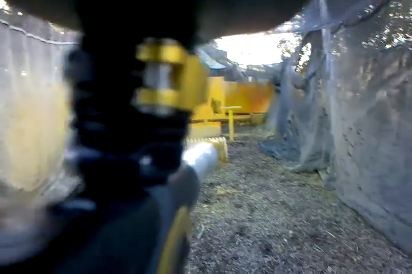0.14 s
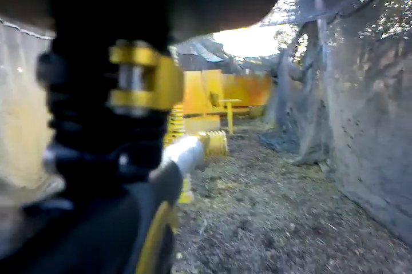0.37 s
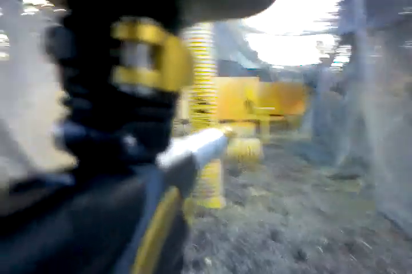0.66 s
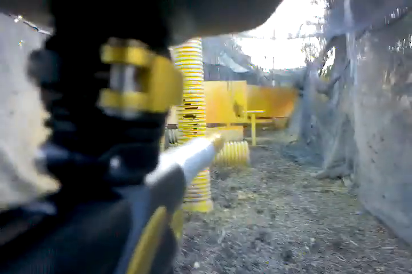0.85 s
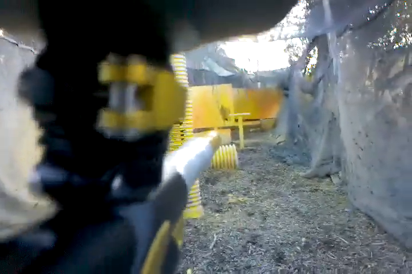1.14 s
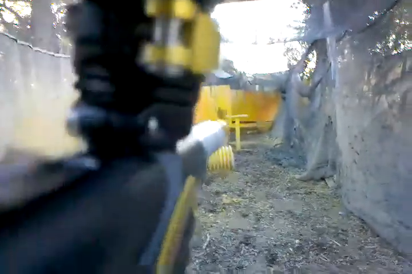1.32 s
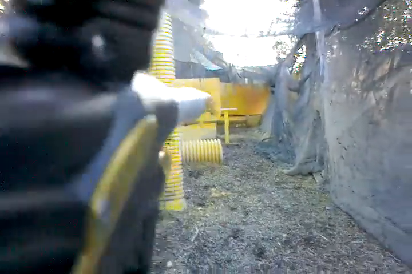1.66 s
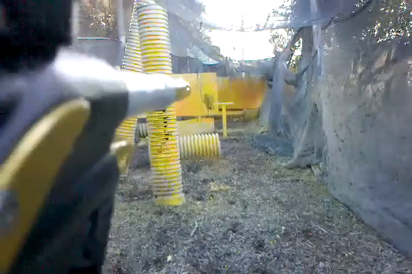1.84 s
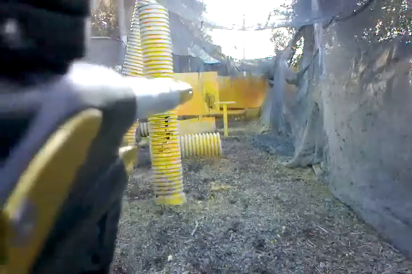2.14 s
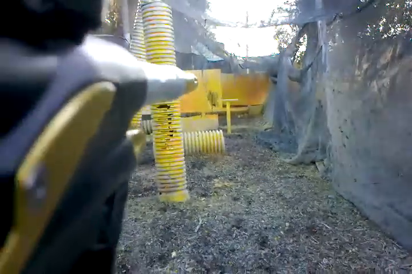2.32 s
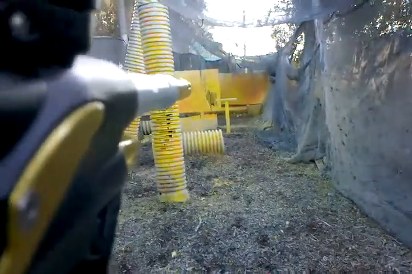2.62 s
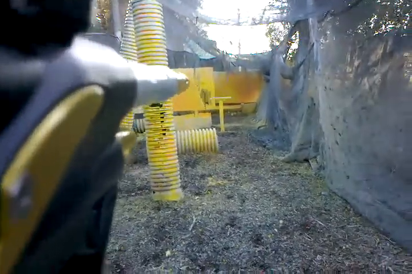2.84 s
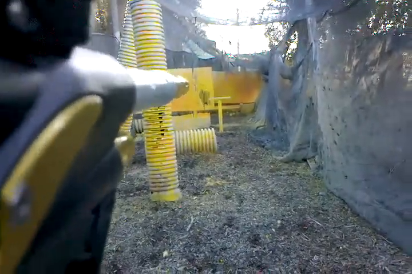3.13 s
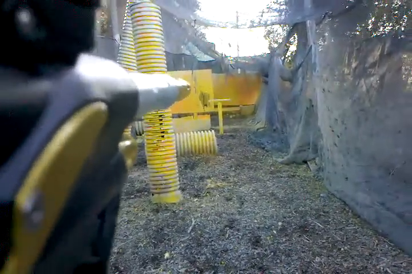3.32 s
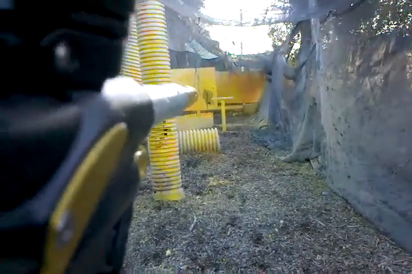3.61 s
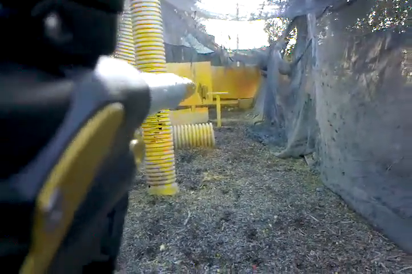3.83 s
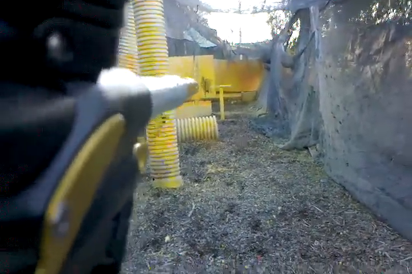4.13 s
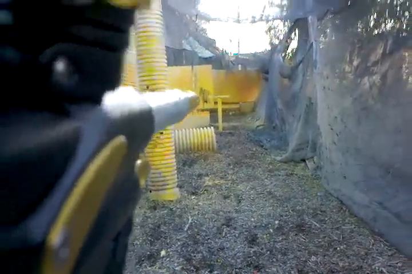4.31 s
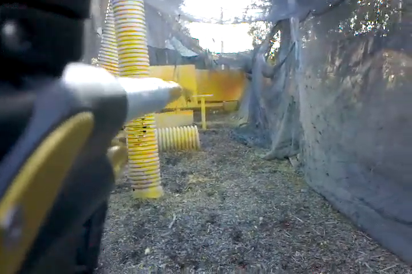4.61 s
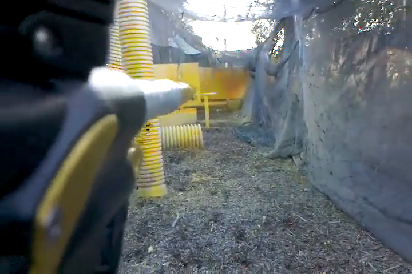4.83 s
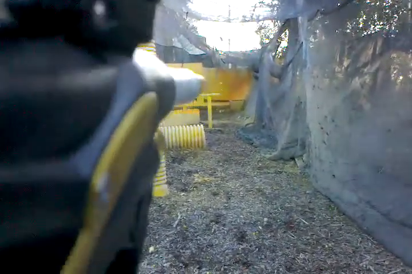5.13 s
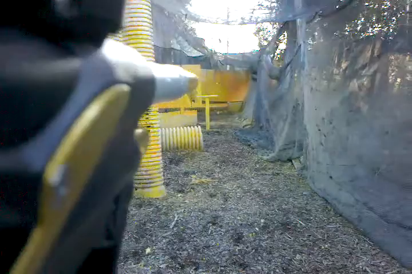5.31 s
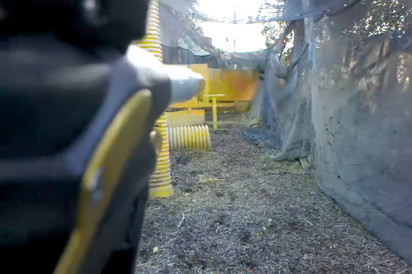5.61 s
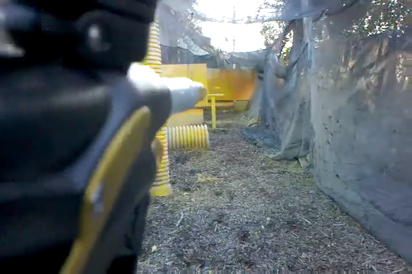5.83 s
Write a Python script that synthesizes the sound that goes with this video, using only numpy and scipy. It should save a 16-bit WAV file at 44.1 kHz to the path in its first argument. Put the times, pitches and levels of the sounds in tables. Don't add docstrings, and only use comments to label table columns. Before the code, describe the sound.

Faint finger clicks, two separate loud paintball marker shots, then a rapid unbroken string of harsh, overloaded shots in a netted outdoor lane.

```python
import sys
import numpy as np
from scipy import signal
from scipy.io import wavfile

SR = 44100
rng = np.random.default_rng(int(sys.argv[2]) if len(sys.argv) > 2 else 0)


def convert_level_to_amplitude(level_db):
    exponent = np.asarray(level_db, float) / 20
    return 10 ** exponent


def unload_audio(sound):
    columns = np.transpose(np.atleast_2d(sound))
    steps = np.round(np.clip(columns, -1, 1) * 32767)
    wavfile.write(sys.argv[1], SR, steps.astype(np.int16))


N = 263026

# (valve opens [s], tightness of the
# ball in the barrel [dB])
SHOTS = [(1.4005, -1.5), (1.6093, -0.5), (1.7351, -1.5), (1.795, -10), (1.838, 1.5), (1.8965, -2),
         (1.9521, -4), (2.0077, -0.5), (2.0661, 2), (2.125, -4), (2.1806, 0), (2.235, -3),
         (2.291, 3), (2.3518, 2.5), (2.407, -2), (2.4641, 1), (2.5227, 1.5), (2.5789, 4),
         (2.6405, -1), (2.701, 0), (2.7593, 3), (2.8143, 3), (2.8747, -0.5), (2.9332, 1),
         (2.987, 1.5), (3.0464, 1), (3.1063, 1), (3.1647, 2), (3.223, -1.5),
         (3.275, 1.5), (3.3307, -4), (3.3839, 0.5), (3.4451, 3), (3.4982, 3), (3.554, 1.5),
                (3.6098, -1.5), (3.6698, -1), (3.7276, -2), (3.7826, -12), (3.8403, -0.5), (3.901, 0),
                (3.957, 2.5), (4.0036, 0), (4.057, 0.5), (4.113, -5), (4.176, -2.5), (4.24, -5),
                (4.2965, 0.5), (4.3504, -2), (4.4098, 0), (4.4675, -0.2), (4.5241, -3.5), (4.5835, -4),
                (4.6328, -1), (4.6881, -1), (4.7484, -4), (4.8035, 2.5), (4.8625, -2), (4.9198, 2),
         (5.0189, 3), (5.0718, -16), (5.128, 2), (5.1859, 2.5), (5.2402, -3), (5.2954, 1.5),
                 (5.343, 2), (5.3935, 3), (5.4481, 1.5), (5.5043, 4), (5.564, 0), (5.618, 4), (5.675, 2),
                 (5.7278, -0.5), (5.821, -5), (5.8761, 0.5), (5.936, 1)]
# (time after the valve opens [ms], level [dB], scatter [ms],
# favoured pitch [Hz], spread [octaves])
BOLT_KNOCKS = [
    (-11, 8, 0.035, 2480, 0.86),
    (-11.5, 7, 0.024, 710, 0.53),
    (-9, 8.5, 0.1, 2080, 0.31),
    (-8, -2, 0.794, 2130, 0.75),
    (-3.5, -2.5, .8, 2430, 0.37),
]
# (time [s], level [dB])
FIRST_KNOCKS = [
    (1.3881, -1),
    (1.3914, 6),
    (1.3977, -1),
]
# (time after the valve opens [ms], level [dB], scatter [ms],
# favoured pitch [Hz], spread [octaves])
VALVE_KNOCKS = [(0.22, 7, 0.015, 1320, 2.33), (1.38, 13.5, 0.017, 1840, 2.1), (2.5, 9, 0.048, 1460, 1.21),
                (5.5, 13, 0.077, 5630, 0.66), (7, 5.5, 0.051, 2500, 1.16), (9.5, 9, 0.05, 5300, 0.52),
                (13, -4, .3, 2400, 0.98), (16.5, 13.5, 0.28, 6500, 0.25), (18.5, 7, .3, 4100, 0.88),
                (20.5, -6, .3, 2100, 1.5), (23, 0, 0.16, 5000, 0.58), (29, -9, 0.04, 1980, 0.28),
                (38, -18, .4, 2250, 0.29)]
# (time after the valve opens [ms], level [dB], scatter [ms],
# favoured pitch [Hz], spread [octaves])
LANE_SLAPS = [
    (49.7, -26, 1.72, 2200, 0.51),
    (71, -18.5, 0.46, 2500, 0.66),
    (100.3, -20, 0.24, 2200, 0.37),
    (140.7, -27, 0.7, 1000, 0.55),
]
# (pitch [Hz], level [dB], time to fade 60 dB [s])
BODY_MODES = [(319.7, -8.5, 0.058), (420.4, -15.5, 0.083), (795, -9, 0.013), (1193, -9, 0.018),
              (1491, -7, 0.021), (1646, -8.5, 0.012), (1975, -12, 0.016), (2400, -8.5, 0.0078),
              (2625, -9, 0.011), (3000, -11.5, 0.012), (3526, -12.5, 0.0091), (3874, -10, 0.0086),
              (4160, -24, 0.012), (5600, -45, 0.0039), (6025, -8.5, 0.0034)]
# (frequency [Hz], level [dB per Hz])
GAS_COLOUR = [(60, -35), (200, 6), (700, 8), (1600, 4), (2600, 14), (3500, -5.5), (4900, 8), (6300, -3.5),
              (10000, -16)]
# (pitch [Hz], width [Hz], level [dB])
PORT_WHISTLES = [(1480, 1700, -8), (2730, 320, -4.5), (6300, 260, -8.5)]
# (pitch [Hz], level [dB], time to fade 60 dB [s], time after the valve opens [ms])
BARREL_AIR = [(167, -13, 0.065, 6.64), (205, -9.5, 0.05, 7.62), (295, -6.5, 0.027, 6.84)]
# (time [s], level [dB], pitch [Hz], time to fade 60 dB [s])
FIRST_THUMP = [
    (1.405, 3, 361, 0.05),
]
# (frequency [Hz], level [dB per Hz])
LANE_COLOUR = [(60, -38), (150, -2), (400, -2.5), (700, -22), (1600, -2), (2400, -15.5), (4300, -22),
               (6500, -21.5), (10000, -16)]
# (frequency [Hz], time to fade 60 dB [s])
LANE_DECAY = [(200, 0.28), (2000, 0.27), (7000, 0.46)]
# (frequency [Hz], level [dB])
SPLAT_COLOUR = [(300, -12.5), (700, -10), (1600, -10.5), (2500, 1), (4000, -11), (6500, -19)]
# (pitch [Hz], level [dB], time to fade 60 dB [s])
TANK_MODES = [(466, -31, 0.64), (1857, -46, .4), (2315, -42, 0.34)]
# (time [s], peak level [dB], pitch
# [Hz], time to fade 60 dB [s])
GRIP_TICKS = [(0.174, -37, 2720, 0.011), (0.2442, -36, 2350, 0.008), (0.2544, -45, 1530, 0.008),
              (0.2832, -39, 2360, 0.008), (0.584, -42, 3460, 0.0059), (0.6539, -41, 2400, 0.008),
              (0.659, -21.5, 3170, 0.011), (0.711, -39, 3180, 0.008), (0.9302, -39, 1820, 0.008),
              (0.999, -36, 2380, 0.0087), (1.01, -32, 1530, 0.008),
              (0.6, -20, 5350, 0.0016),
    (.612, -42, 5500, .01),
    (1.3648, -46, 2200, .008),
    (1.379, -44, 3000, 0.012),
    (1.387, -33, 2500, 0.036),
    (1.593, -21, 3400, 0.017),
    (1.712, -27, 2200, .012),
]
# (time [s], level [dB], pitch [Hz], width [Hz], time to fade 60 dB [s])
SPRING_BUZZ = [
    (.664, -51, 3200, 250, 0.61),
]
# (time [s], peak level [dB], fade [dB per s])
GLOVE_RUSTLE = [
    (.18, -55, 140),
    (.59, -49, 220),
    (.67, -56, 110),
    (.94, -59, 155),
]
# (frequency [Hz], level [dB per Hz])
TRAFFIC_COLOUR = [(24, -46), (40, -21), (131, 9), (408, -4.5), (475, -9), (579, -4), (705, 0), (916, -2.5),
                  (1250, -10), (2450, -13.5), (4740, -32.5), (6580, -25), (7500, -45), (9750, -75),
                  (16500, -120)]


def rms_one(x):
    return x / np.sqrt(np.mean(x ** 2) + 1e-20)


def butter(x, order, hz, kind="low"):
    return signal.sosfilt(signal.butter(order, hz, kind, fs=SR, output="sos"), x)


def at_hz(points, hz):
    table_hz, values = np.array(points).T
    return np.interp(np.log(hz), np.log(table_hz), values)


def clicks(seconds, sizes):
    seconds = np.asarray(seconds)
    out = np.full(N, 1e-18)
    places = np.clip(np.round(seconds * SR).astype(int), 0, N - 1)
    np.add.at(out, places, sizes * (seconds < N / SR))
    return out


def ring(x, hz, t60):
    r = convert_level_to_amplitude(-60 / (t60 * SR))
    w = 2 * np.pi * hz / SR
    return signal.lfilter([0, np.sin(w)], [1, -2 * r * np.cos(w), r * r], x)


def drift(rate):
    r = np.exp(-2 * np.pi * rate / SR)
    return rms_one(signal.lfilter([1], [1, -2 * r, r * r], rng.standard_normal(N + SR))[SR:])


def bands(spectrum):
    edges = 40 * 2 ** np.arange(0, 8.1, .5)
    centres = np.sqrt(edges[:-1] * edges[1:])
    white = rng.standard_normal((2, N))
    noise = []
    for k, hz in enumerate(centres):
        level = convert_level_to_amplitude(at_hz(spectrum, min(hz, 6400)))
        noise.append(level * butter(white[k % 2], 2, edges[k:k + 2], "band"))
    return centres, np.array(noise) / np.std(sum(noise))


def struck_body(at, contacts, strength_db, vary_db, ring_share=1):
    ms, db, scatter, favoured_hz, spread = np.transpose(contacts)
    jitter = scatter * rng.standard_normal((len(at), len(ms)))
    times = at[:, None] + (ms + jitter) / 1000
    force_db = strength_db[:, None] + db + vary_db * rng.standard_normal(times.shape)
    out = np.zeros(N)
    for hz, mode_db, t60 in BODY_MODES:
        place = 1 / (1 + (np.log2(hz / favoured_hz) / spread) ** 2)
        luck_db = vary_db * rng.standard_normal(times.shape)
        sizes = -place * convert_level_to_amplitude(force_db + mode_db + luck_db)
        out += ring(clicks(times.ravel(), sizes.ravel()), hz, ring_share * t60)
    return out


def bolt(at):
    strength_db = -3.2 - 0.24 * (at - at[0])
    knocks = struck_body(at[1:], BOLT_KNOCKS, strength_db[1:], vary_db=2.5, ring_share=0.71)
    first, first_db = np.transpose(FIRST_KNOCKS)
    return knocks + struck_body(first, [(0, 0.0039, 0, 2600, 0.6)], first_db, vary_db=1.0)


def valve(at):
    return struck_body(at, VALVE_KNOCKS, 0 * at, vary_db=1.8)


def gas(at):
    hurry_ms = np.maximum(61.4 - 1000 * np.diff(at, prepend=0), 0)
    gas_db = -0.02 + 0.26 * (at - at[0]) - 0.08 * hurry_ms
    ms = np.cumsum([0, 1.28, 19.5, 5.0, 30.0])
    db = -5.5 - np.cumsum([0, 3.5, 20.0, 22.0])
    flow = convert_level_to_amplitude(np.interp(np.arange(0, ms[-1], 1000 / SR), ms, np.append(-60, db)))
    starts = clicks(at + 0.87 / 1000, convert_level_to_amplitude(gas_db))
    pressure = signal.fftconvolve(starts, flow)[:N]
    hiss = bands(GAS_COLOUR)[1].sum(0)
    white = rng.standard_normal(N)
    whistle = sum(convert_level_to_amplitude(db) * rms_one(ring(white, hz, 1.17 / width)) for hz, width, db in PORT_WHISTLES)
    return pressure * convert_level_to_amplitude(1.0 * drift(260)) * rms_one(hiss + 0.39 * whistle)


def barrel(at, seal_db):
    wobble = rng.normal(0, 0.00054, len(at))
    push = np.zeros(N)
    for hz, db, t60, ms in BARREL_AIR:
        push += ring(clicks(at + ms / 1000 + wobble, -convert_level_to_amplitude(db + 2.0 * seal_db)), hz, t60)
    for s, db, hz, t60 in FIRST_THUMP:
        push += ring(clicks([s], -convert_level_to_amplitude(db)), hz, t60)
    return butter(push, 2, 700)


def slaps(at):
    return butter(struck_body(at, LANE_SLAPS, 0 * at, vary_db=1.5), 2, 3500)


def lane(at):
    centres, noise = bands(LANE_COLOUR)
    start = clicks(at + 0.017, np.ones(len(at)))
    power = []
    for hz in centres:
        keep = convert_level_to_amplitude(-120 / (at_hz(LANE_DECAY, hz) * SR))
        power.append(signal.lfilter([1], [1, -keep], start))
    return convert_level_to_amplitude(-27.5 + 2.0 * drift(160)) * (noise * np.sqrt(power)).sum(0)


def splats(at):
    sizes = convert_level_to_amplitude(3.0 * np.minimum(rng.exponential(1, N), 3.0)) * rng.choice([-1, 1], N)
    sizes = sizes * (rng.random(N) < 5000.0 / SR)
    dealt = rng.integers(0, 20, N)
    knocks = np.zeros(N)
    for k, hz in enumerate(np.geomspace(300, 6500, 20)):
        one_pitch = ring(sizes * (dealt == k) + 1e-18, hz, 9.0 / hz)
        knocks += convert_level_to_amplitude(at_hz(SPLAT_COLOUR, hz)) * rms_one(one_pitch)
    lag_s, settle_s = 0.29, 0.2
    landed = clicks(at + lag_s, np.ones(len(at)))
    pile = signal.lfilter([1], [1, -np.exp(-1 / (settle_s * SR))], landed)
    return convert_level_to_amplitude(-35.5) * pile * rms_one(knocks)


def tank(at):
    t = np.arange(N) / SR
    since = t - np.append(-9, at)[np.searchsorted(at, t)]
    return sum(convert_level_to_amplitude(db - 60 * since / t60) * np.sin(2 * np.pi * hz * t) for hz, db, t60 in TANK_MODES)


def grip():
    out, t = np.zeros(N), np.arange(N) / SR
    for s, db, hz, t60 in GRIP_TICKS:
        tick = clicks([s + 0.0016], convert_level_to_amplitude(db))
        out += ring(tick, hz, t60)
        out += .5 * ring(tick, min(1.34 * hz, 6500), 0.32 * t60)
    for s, db, hz, width, t60 in SPRING_BUZZ:
        fade = (t > s) * convert_level_to_amplitude(db - 60 * np.abs(t - s) / t60 + 3.0 * drift(60))
        out += fade * rms_one(ring(rng.standard_normal(N), hz, 1.4 / width))
    shifts = []
    for s, db, fade in GLOVE_RUSTLE:
        slope = np.where(t < s, 1200.0, fade)
        shifts.append(db - slope * np.abs(t - s))
    rustle_db = np.maximum(np.max(shifts, axis=0), -84)
    out += convert_level_to_amplitude(rustle_db + 3.0 * drift(120) + 5.0) * rng.standard_normal(N)
    return butter(out, 2, 1700, "high")


def traffic():
    return convert_level_to_amplitude(-47.5) * sum(band * convert_level_to_amplitude(1.5 * drift(2.4)) for band in bands(TRAFFIC_COLOUR)[1])


def scene():
    at, seal_db = np.transpose(SHOTS)
    marker = bolt(at) + valve(at) + gas(at) + barrel(at, seal_db) + slaps(at)
    around = lane(at) + splats(at) + tank(at) + grip() + traffic()
    no_top = signal.cheby2(8, 40, 7700, fs=SR, output="sos")
    return (marker + signal.sosfilt(no_top, around))[None]


def top_cut(x):
    return signal.sosfilt(signal.butter(12, 16460, fs=SR, output="sos"), x)


def record(dry):
    capsule = 0.63 * np.tanh(butter(dry, 1, 60.0, "high") / 0.62)
    narrow = signal.sosfilt(signal.cheby1(4, .5, 6900, fs=SR, output="sos"), capsule)
    narrow = signal.sosfilt(signal.cheby2(8, 60, 10200, fs=SR, output="sos"), narrow)
    narrow = butter(narrow, 1, 120.0, "high")
    clipped = np.clip(narrow, -.71, .71)
    mix = signal.sosfilt(signal.cheby2(12, 60, 16400, fs=SR, output="sos"), clipped)
    return top_cut(mix)


dry = scene()
out = record(dry)
unload_audio(out)
```